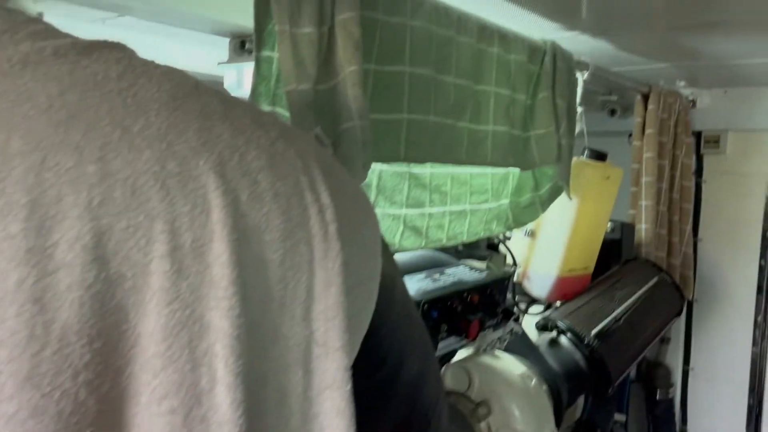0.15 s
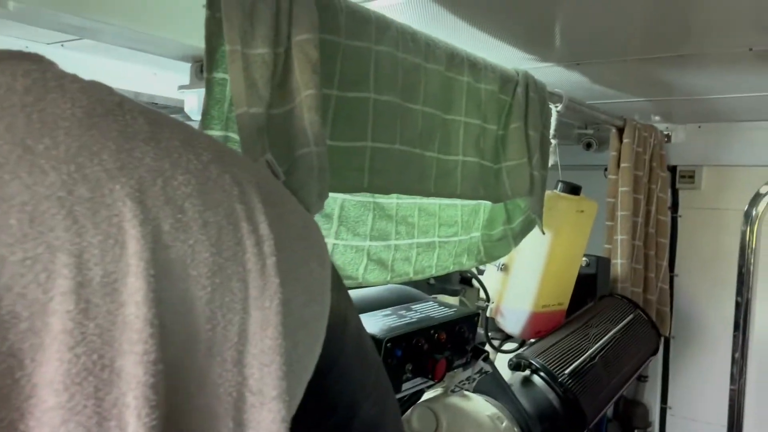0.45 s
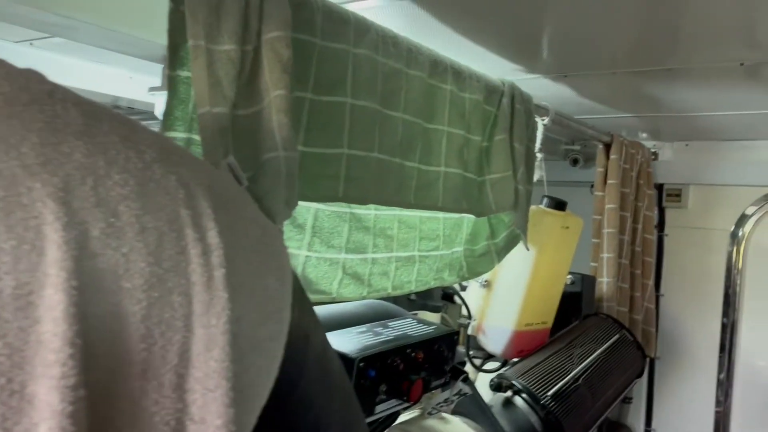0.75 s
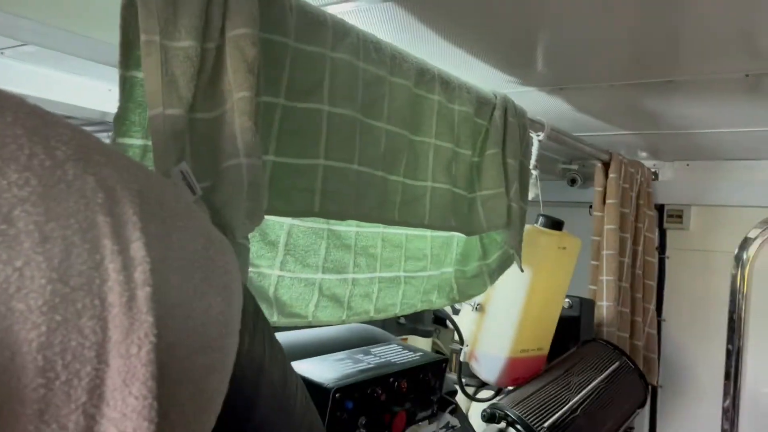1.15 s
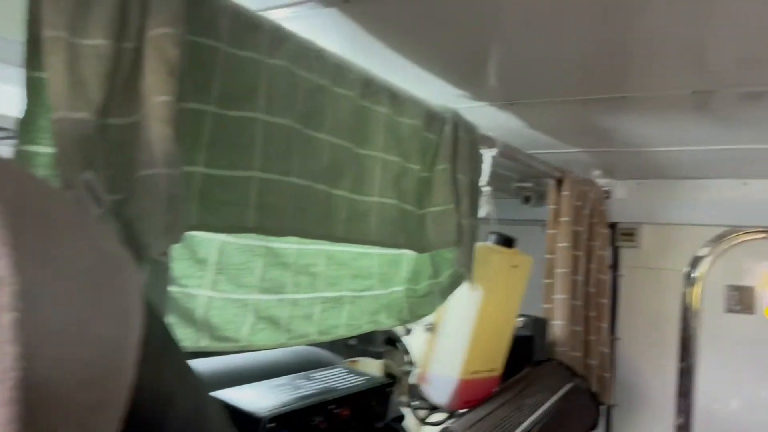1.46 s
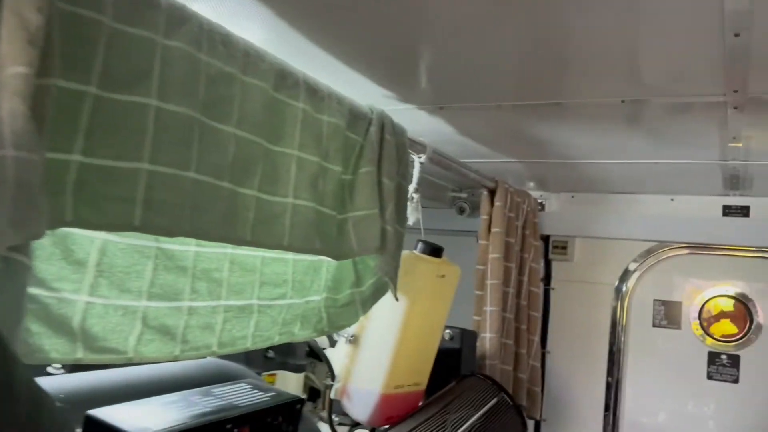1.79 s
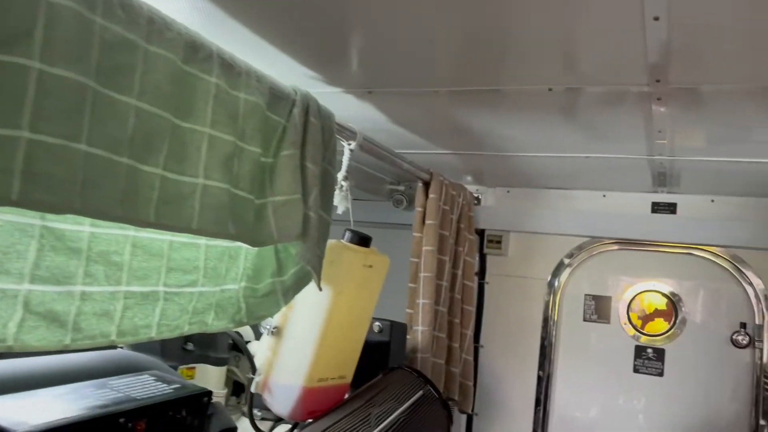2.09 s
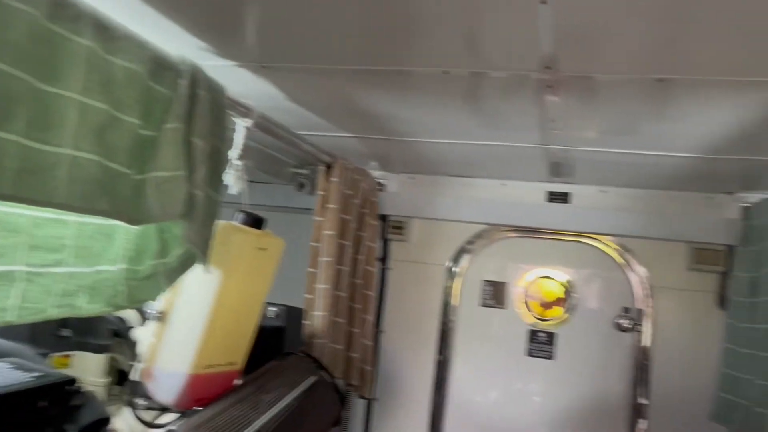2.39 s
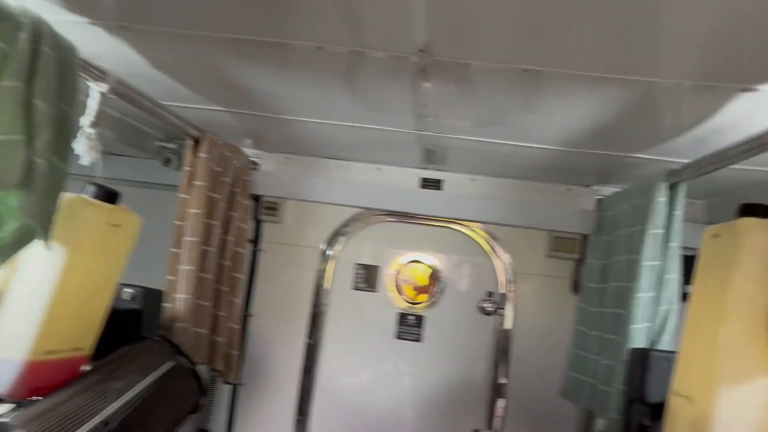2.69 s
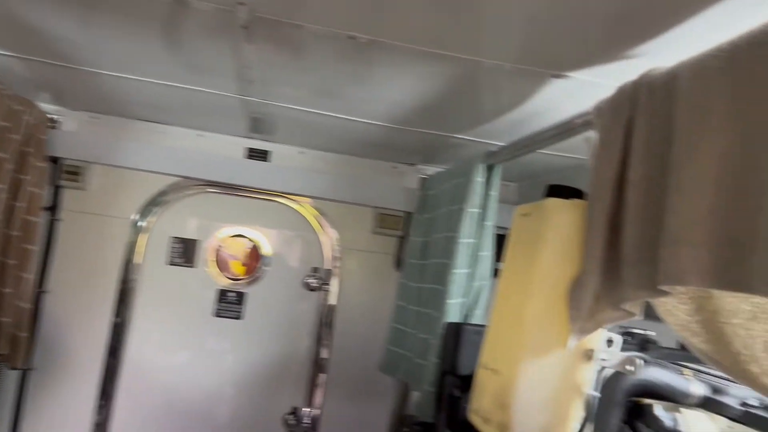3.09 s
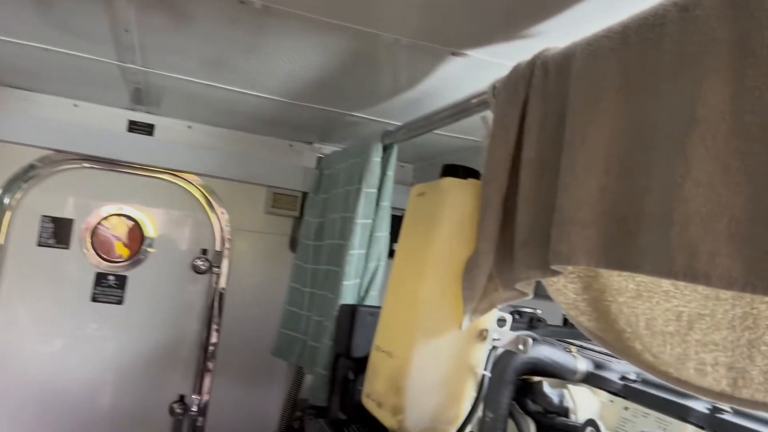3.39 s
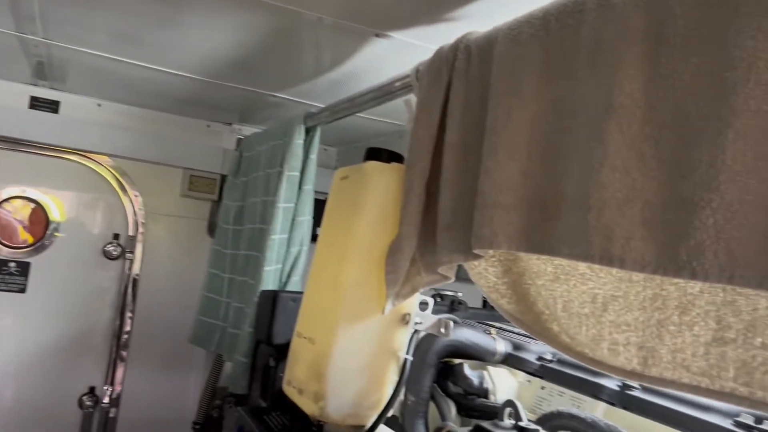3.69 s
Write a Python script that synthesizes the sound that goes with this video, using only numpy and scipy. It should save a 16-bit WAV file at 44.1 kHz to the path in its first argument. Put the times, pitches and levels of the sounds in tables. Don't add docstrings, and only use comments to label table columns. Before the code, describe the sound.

Close, steady diesel engine drone with low rumble, faint electric whine and rapid hissy pump ticks; metallic casing rings shift as the nearby microphone turns, then a dull knock and brief rub near three seconds.

```python
import sys
import numpy as np
from scipy import signal
from scipy.fft import rfft, irfft, next_fast_len
from scipy.io import wavfile
from scipy.ndimage import uniform_filter1d

SR = 44100
rng = np.random.default_rng(int(sys.argv[2]) if len(sys.argv) > 2 else 0)


def inscribe(sig):
    pcm = np.round(np.clip(np.atleast_2d(sig).T, -1, 1) * 32767)
    wavfile.write(sys.argv[1], SR, pcm.astype(np.int16))


def voltage_ratio(level):
    return 10 ** (np.asarray(level, float) / 20)


N = 169785
T = np.arange(N) / SR
TURN = T / T[-1]


def evened(x):
    return x / np.sqrt(np.mean(x ** 2) + 1e-20)


def read(points, hz):
    f, value = np.transpose(points)
    return np.interp(np.log(hz + 1), np.log(f + 1), value)


def curve(rows, t):
    rows = np.array(rows)
    return np.interp(t, rows[:, 0], rows[:, 1])


def slow(rate_hz):
    f, t = np.geomspace(.15, rate_hz, num=16), T[::128]
    sines = np.sin(2 * np.pi * (f * t[:, None] + rng.random(16))) / np.sqrt(f)
    return np.interp(T, t, evened(sines.sum(1)))


def band(hz, width_hz):
    f = np.fft.rfftfreq(N, 1 / SR)
    resonance = 1 / (1 + ((f - hz) / (width_hz / 2)) ** 2)
    return evened(irfft(rfft(rng.standard_normal(N)) * resonance, N))


# f/Hz, left-right/dB
TILT = [(60, -14.5), (130, 8), (280, -6.5), (620, -1.5), (1340, -1.5), (2910, 5.5), (6320, 4),
        (13700, -2.5)]
# f/Hz, left lead/rad
LEAD = [(0, 0), (300, .1), (690, 1.8), (4600, .7), (5800, -1), (8300, -3.14), (12200, -6.28), (14500, -8.2)]


def port_half(hz):
    return voltage_ratio(read(TILT, hz) / 2) * np.exp(.5j * read(LEAD, hz))


def ports(x):
    size = next_fast_len(N + 4096)
    half = port_half(np.fft.rfftfreq(size, 1 / SR))
    return irfft(rfft(x, size) * np.array([half, 1 / half]), size)[:, :N]


# f/Hz, left-right likeness/1
SAME = [(60, 0.64), (160, 0.99), (300, 0.66), (700, 0.47), (2000, 0.43), (5000, 0.29), (8200, 0.91),
        (13000, 0.95)]


def wash(shape_db, size):
    patch_db, drift_db = .9, 1.2
    hop = size // 4
    frames, hz = N // hop + 5, np.fft.rfftfreq(size, 1 / SR)[:, None]
    a, b, c, d, patch, drift = rng.standard_normal((frames, len(hz), 6)).T
    patch = evened(uniform_filter1d(uniform_filter1d(patch, size=8, axis=0), size=10, axis=1))
    drift = evened(uniform_filter1d(uniform_filter1d(drift, size=6, axis=0), size=120, axis=1))
    same, half = np.clip(read(SAME, hz), 0, 1), port_half(hz)
    left = a + 1j * b
    right = same * left + np.sqrt(1 - same ** 2) * (c + 1j * d)
    z = np.array([left * half, right / half])
    z *= voltage_ratio(shape_db(hz, np.arange(frames) * hop / SR) + patch_db * patch + drift_db * drift)
    return evened(signal.istft(z, nperseg=size, noverlap=size - hop)[1][:, :N])


# f/Hz, density/dB per Hz
RUMBLE = [(20, -44), (35, -37), (50, -11.5), (72, -3.5), (108, -4.5), (229, -8), (349, -25.5), (700, -50.5)]


def rumble():
    firing_db = curve(FIRING, T)
    fall_db = 0.25 * (firing_db - np.mean(firing_db))
    return voltage_ratio(-40 + fall_db) * wash(lambda hz, t: read(RUMBLE, hz) + 0 * t, size=4096)


# f/Hz, density/dB per Hz
ROAR = [(300, 1), (600, 2.5), (1300, -2), (2500, -9.5), (4500, -16.5), (7000, -21), (10000, -27.5),
        (14500, -38.5)]
# f/Hz, width/Hz, level/dB, change over the turn/dB, swell at mid turn/dB
BLOCK = [(337, 22, -4, -17, 7.5), (527, 55, 3.5, -4, 1.5), (787, 46, 0, -2, 3), (1000, 77, 4.5, 3, -1.5),
         (1390, 140, -4, 2.5, 3.5), (1640, 69, 0.5, 2, -0.5), (1990, 180, 1, 0.5, -0.5),
         (2560, 160, 1, 3.5, 1.5), (4290, 360, 3.5, -0.5, 0), (4750, 220, 0.5, -2, -3),
         (5290, 270, -0.5, 1, 0.5), (5870, 910, 1.5, -4, -0.5), (7500, 130, -3, -10, 3.5)]
# t/s, level/dB
ROAR_LEVEL = [(0.06, -47.5), (1.17, -49), (1.83, -50), (1.86, -49.5), (2.36, -50.5), (2.37, -50),
              (2.54, -50), (3.8, -49.5)]


def roar():
    def field(hz, t):
        turn = t / T[-1]
        shape = read(ROAR, hz) - 40 * (hz < 200)
        shape = shape + 0.5 * (turn - .5) / (1 + (hz / 1000) ** 2)
        for f, width, db, change_db, swell_db in BLOCK:
            height_db = db + change_db * (turn - .5) + swell_db * np.sin(np.pi * turn)
            shape = shape + height_db / (1 + ((hz - f) / width) ** 2)
        return shape
    throb_db = .8 * np.cos(2 * np.pi * CYCLE_HZ * (T - .03))
    return voltage_ratio(curve(ROAR_LEVEL, T) + 8 + throb_db) * wash(field, size=1024)


# f/Hz, level/dB
WHINE = [(1685, -68), (1755, -67), (4059, -75), (4107, -75), (4683, -77), (4786, -75), (5841, -78),
         (5895, -80), (5943, -74), (5997, -73), (6051, -78), (6099, -78), (6153, -80), (6255, -74),
         (11682, -88), (11892, -89), (11994, -82), (12204, -88)]


def whine():
    out = np.zeros(N)
    for hz, db in WHINE:
        level = voltage_ratio(db + 2 + 1.6 * slow(5))
        waver = np.cumsum(2.0 * slow(8.36)) / SR
        out += np.sqrt(2) * level * np.cos(2 * np.pi * (hz * T + waver + rng.random()))
    return out


# centre t/s, half length/s, f/Hz, level/dB
RIDGES = [
    (.12, .22, 950, -54),
    (1.1, .4, 950, -54),
    (1.1, .3, 840, -58),
    (.2, .14, 1760, -58),
    (1.55, .15, 1720, -61),
    (2.55, .4, 1700, -57),
    (3.4, .4, 905, -59),
]


def ridges():
    out = np.zeros(N)
    for s, half_s, hz, db in RIDGES:
        out += voltage_ratio(db) * np.exp(-((T - s) / half_s) ** 4) * band(hz, width_hz=24)
    return out


# t/s, level/dB
TICK_LEVEL = [(0, -76), (.7, -60), (1.5, -60.5), (2.3, -58.5), (3.4, -60.5), (3.85, -55.5)]


def pump():
    per_s, start_s, rise_s, decay_s = 19.27, .0346, .0017, .013
    strokes = (T - start_s) * per_s + 1
    size = voltage_ratio(1.6 * rng.standard_normal(100))[strokes.astype(int)]
    age = strokes % 1 / per_s
    tick = np.minimum(age / rise_s, 1) * np.exp(-age / decay_s)
    return voltage_ratio(curve(TICK_LEVEL, T) + 5) * size * tick * band(4150, width_hz=1500)


# t/s, peak/dB
KNOCKS = [
    (2.93, -31),
    (2.953, -24),
    (2.996, -24),
    (3.035, -27),
    (3.094, -26),
]


def bump():
    knock_hz, rise_s, decay_s = 80, .006, .022
    thud = np.zeros(N)
    for s, db in KNOCKS:
        u = np.maximum(T - s, 0)
        swell = (1 - np.exp(-u / rise_s)) * np.exp(-u / decay_s)
        thud -= voltage_ratio(db + 6) * swell * np.sin(2 * np.pi * knock_hz * u)
    stroke = np.exp(-((T - 2.935) / .04) ** 2)
    rub = voltage_ratio(-46) * band(1350, width_hz=220)
    swish = voltage_ratio(-58.5) * band(8000, width_hz=12000)
    return thud + stroke * (rub + swish)


CYCLE_HZ = 15.0256
# t/s, level/dB
FIRING = [(0.1, -17), (0.38, -16), (0.64, -18), (1.19, -18), (2.16, -22), (2.25, -20), (2.5, -20),
          (2.77, -22), (3.75, -21)]
# order/1, level/dB, change over the turn/dB, swell at mid turn/dB, left-right/dB
ORDERS_DB = [(3.05, -61, 3, -2, 9.5), (5, -31, -5, -1, -0.5), (6, -45.5, -2.5, 2, 1),
             (7, -37.5, -3, 0.5, -5.5), (8, -38, -11, 1.5, -2.5), (9, -42.5, -12.5, 4.5, -3.5),
             (10, -51, 20.5, 6.5, 0.5), (10.83, -42.5, 3, -0.5, -3), (12, -44.5, 5.5, -8, 12.5),
             (13, -48, -6, -1, -5), (14, -56.5, -17, 9.5, -3), (15.077, -42.5, -5, 3, -1.5),
             (15.95, -55.5, 0.5, 6.5, -14.5), (16.66, -53.5, 1.5, -4.5, 8.5), (18.94, -61, -13.5, -3.5, 12),
             (20.08, -61.5, -1, 15.5, 0.5), (23.04, -65.5, -18.5, 3.5, -3.5), (25.98, -68.5, -5, 5.5, 5.5),
             (27.11, -60.5, 15.5, 6.5, 8), (28.1, -65.5, 1, 6.5, -1)]
# order/1, level/dB, change over the turn/dB
UPPER = [(30, -61, 0), (32, -61, -8), (33, -63, -3), (39, -64, -14), (60, -64, 4), (63, -61, -6)]
PANELS = [(4.5, 1.9, -.3), (15, -1.5, -.5)]


def order_lag(k):
    lag = .5 if k % 2 else 2.3
    for at, swing, shift in PANELS:
        if abs(k - at) <= 1:
            lag += swing * np.sign(k - at) + shift * (k % 2 == 0)
    return lag


def hum():
    pulse_s, wander_db, wander_rad = .01536, .3, .004
    out, shake = np.zeros((2, N)), slow(2.12)
    rows = [(4, curve(FIRING, T), 0, 0, -.8)] + ORDERS_DB
    rows = rows + [(k, db, change_db, 0, -2) for k, db, change_db in UPPER]
    for k, db, change_db, swell_db, pan_db in rows:
        k = round(k)
        loose = 0 if k == 4 else 1 + k / 10
        turn_db = change_db * (TURN - .5) + swell_db * np.sin(np.pi * TURN)
        level = voltage_ratio(db + turn_db + wander_db * loose * slow(3.98))
        wander = wander_rad * k * (shake + loose * slow(3))
        angle = 2 * np.pi * k * CYCLE_HZ * (T - pulse_s) - order_lag(k) + wander
        split = (k > 15) * .3 + (k > 27) * rng.uniform(-1, 1)
        pan = voltage_ratio(np.array([[.5], [-.5]]) * pan_db)
        out += np.sqrt(2) * level * pan * np.cos([angle + split, angle - split])
    return out


def scene():
    return rumble() + roar() + ports(whine() + ridges() + pump() + bump()) + hum()


def low_pass(x):
    return signal.sosfilt(signal.butter(12, 14340, fs=SR, output="sos"), x)


def record(dry):
    return low_pass(dry)


dry = scene()
out = record(dry)
inscribe(out)
```